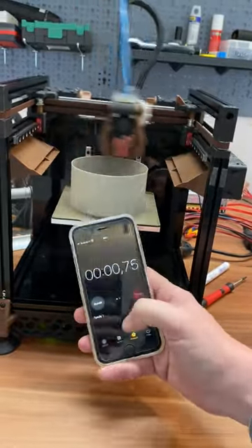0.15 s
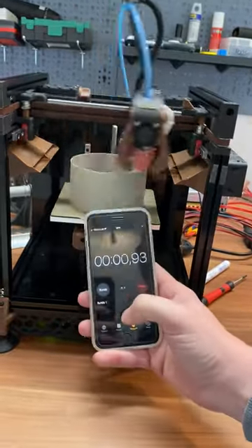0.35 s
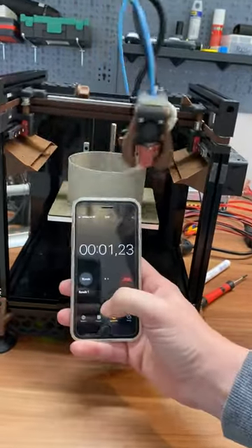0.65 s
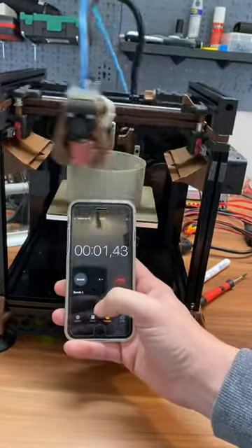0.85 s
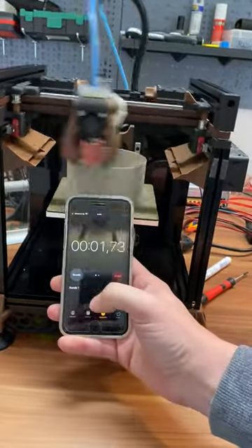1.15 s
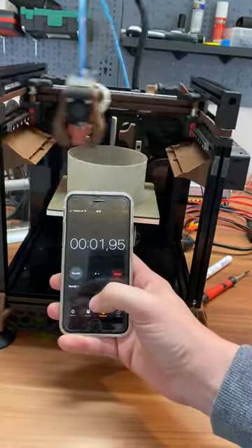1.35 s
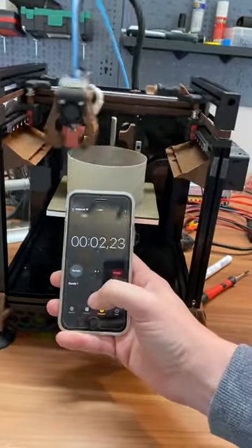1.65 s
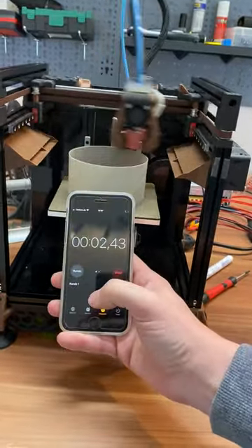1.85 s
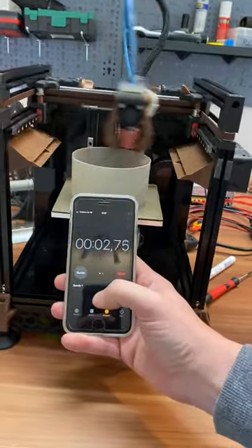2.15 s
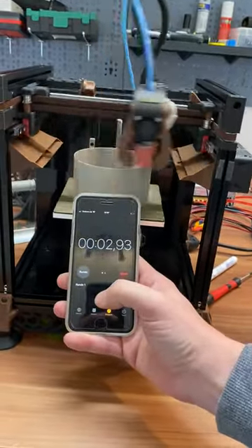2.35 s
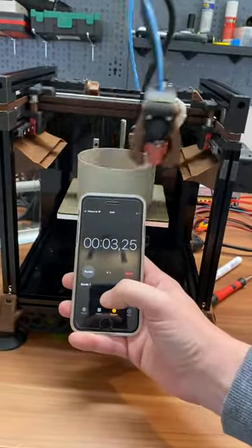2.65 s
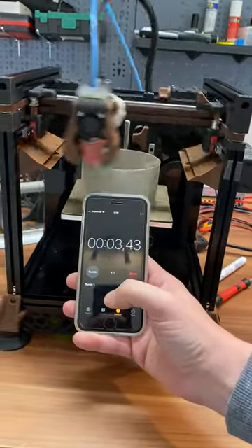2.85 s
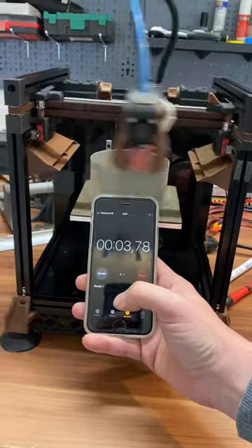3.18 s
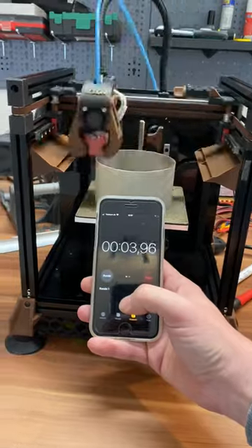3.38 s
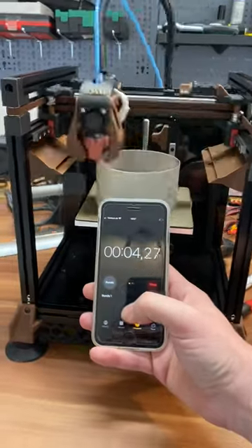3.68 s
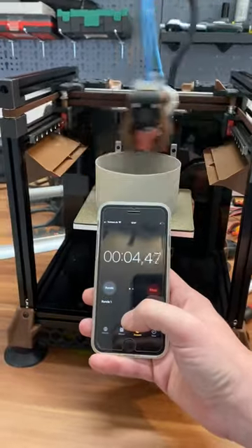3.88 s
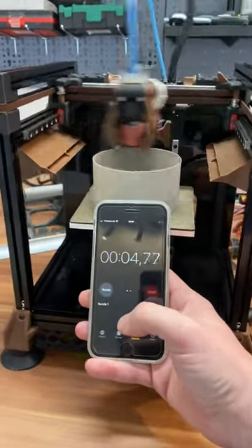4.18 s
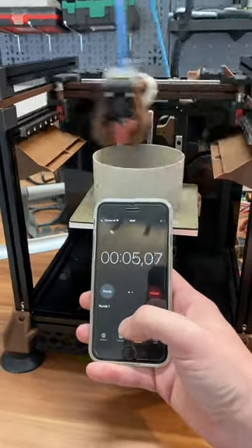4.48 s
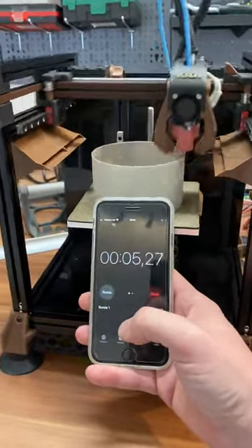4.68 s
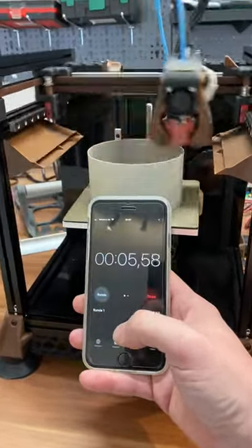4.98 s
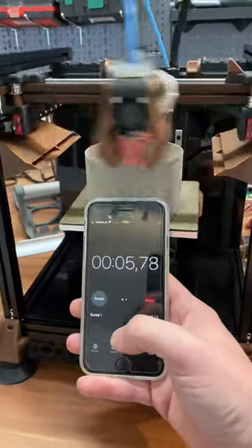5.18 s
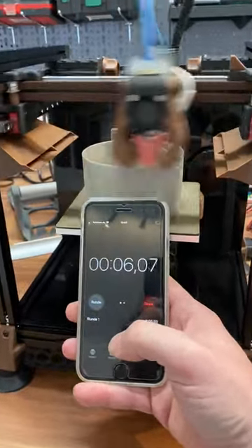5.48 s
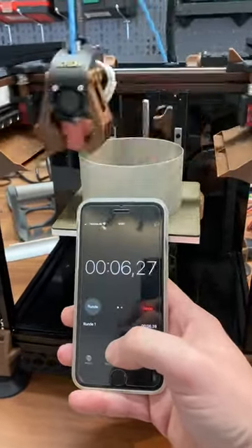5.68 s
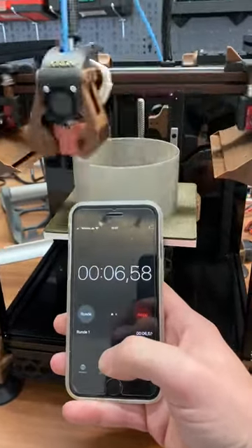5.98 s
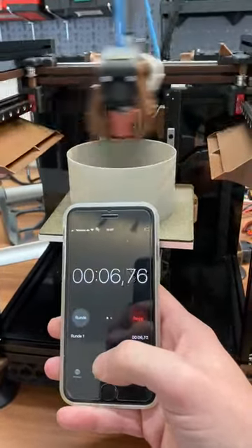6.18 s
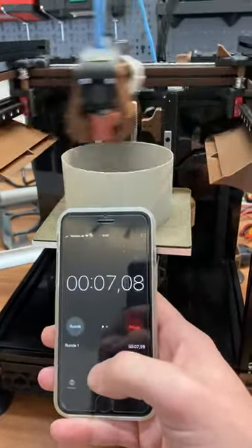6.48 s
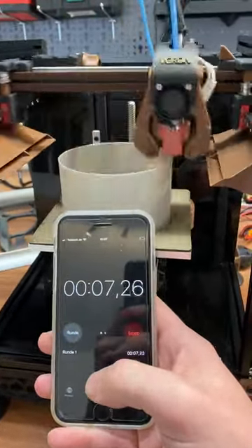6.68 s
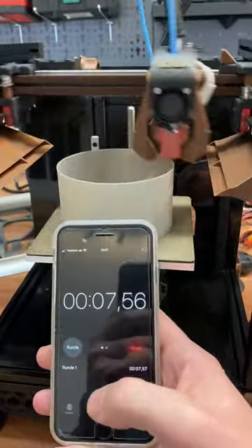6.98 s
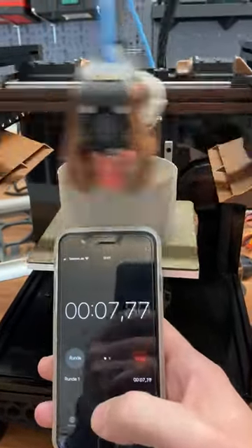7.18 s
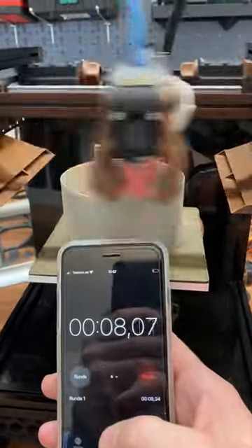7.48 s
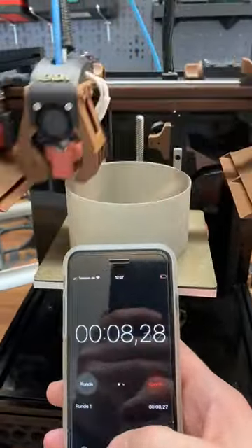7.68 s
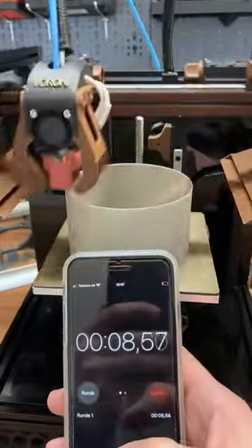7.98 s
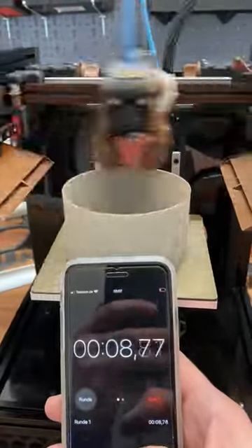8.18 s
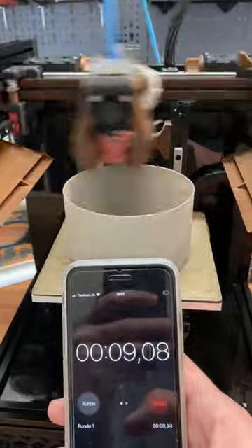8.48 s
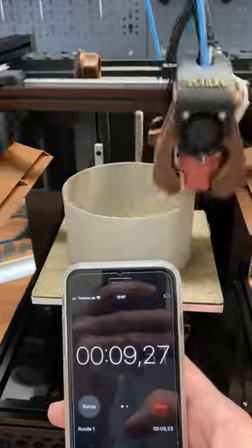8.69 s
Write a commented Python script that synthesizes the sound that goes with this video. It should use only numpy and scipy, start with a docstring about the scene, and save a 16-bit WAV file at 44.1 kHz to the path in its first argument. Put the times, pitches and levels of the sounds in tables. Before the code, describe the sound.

Small cooling fans on a 3D printer hiss and whine continuously, their high tones wavering over a low hum.

```python
"""A workshop with a fast 3D printer. Four small six-bladed blowers hum at their shaft speeds and whine
at multiples of the blade-passing rate; the speeds are nearly equal, so the tones beat. Beneath them
turbulent air rushes and resonates in the ducts. As a handheld phone moves slowly nearer, the rush
grows and changes colour, and a low draught rumble rises. From 8.4 to 11.3 kHz the hiss is opposite
in left and right, with nothing in the centre."""
import sys
import numpy as np
from scipy import signal
from scipy.fft import rfft, irfft, next_fast_len
from scipy.io import wavfile
from scipy.ndimage import uniform_filter1d, map_coordinates

SR = 44100
rng = np.random.default_rng(int(sys.argv[2]) if len(sys.argv) > 2 else 0)


def bounce(signal):
    """Save signal as a 16-bit WAV file at the path given by the first command-line argument."""
    frames = np.transpose(np.atleast_2d(signal))
    limited = np.clip(frames, -1, 1)
    pcm = np.round(limited * 32767).astype(np.int16)
    wavfile.write(sys.argv[1], SR, pcm)


N = 390285

# The phone's approach. Each row: time in seconds, rush and rumble levels in dB, nearness from 0 to 1.
APPROACH = [(0, -24, -50, 0.07), (1, -23.5, -63, 0), (2, -23.5, -64.5, 0.1), (3, -24, -58, 0),
            (4, -23.5, -52, 0.2), (4.75, -23, -52, 0.28), (5.5, -23, -52, 0.43), (6.25, -22.5, -46, 0.63),
            (7, -22, -48, .7), (7.4, -21.5, -44.5, 0.94), (7.75, -21.5, -46.5, 1), (8.1, -22, -47, 1),
            (8.45, -22, -43, 1), (8.85, -22, -45.5, 1)]


def blowers():
    """Superposition: tones of nearly equal frequency beat, while turbulence modulates their levels."""
    # Each row: time in seconds, speed of each of the four shafts in revolutions per second.
    shaft_speeds = [(0.0, 550.6, 552.9, 553.53, 556.01), (0.253, 550.71, 553.13, 553.4, 555.89),
                    (0.506, 550.91, 553.41, 553.77, 555.87), (0.759, 550.86, 553.41, 553.78, 555.91),
                    (1.011, 550.43, 553.59, 553.87, 555.91), (1.264, 550.26, 553.61, 553.68, 555.77),
                    (1.517, 550.21, 553.39, 553.65, 555.74), (1.77, 549.91, 553.41, 553.88, 555.92),
                    (2.023, 549.88, 553.5, 553.8, 555.93), (2.276, 550.07, 553.56, 553.87, 555.95),
                    (2.529, 550.08, 553.56, 553.9, 555.72), (2.781, 550.06, 553.46, 553.97, 555.69),
                    (3.034, 549.79, 553.58, 553.92, 555.78), (3.287, 549.61, 553.55, 553.92, 555.77),
                    (3.54, 549.56, 553.4, 553.81, 555.9), (3.793, 549.69, 553.34, 553.78, 556.07),
                    (4.046, 550.33, 553.31, 553.85, 556.17), (4.299, 550.75, 553.67, 553.75, 556.32),
                    (4.551, 550.64, 553.5, 553.73, 556.19), (4.804, 550.37, 553.1, 553.45, 556.03),
                    (5.057, 549.65, 553.15, 553.46, 556.03), (5.31, 549.77, 553.38, 553.58, 556.05),
                    (5.563, 550.02, 553.17, 553.74, 556.19), (5.816, 549.78, 552.89, 553.85, 555.89),
                    (6.069, 550.12, 552.97, 553.95, 555.78), (6.321, 550.04, 553.19, 553.75, 555.76),
                    (6.574, 549.71, 553.01, 553.81, 555.74), (6.827, 549.37, 552.78, 553.95, 555.81),
                    (7.08, 549.5, 552.74, 553.99, 555.96), (7.333, 549.63, 552.96, 553.92, 555.77),
                    (7.586, 549.34, 553.28, 553.64, 555.79), (7.839, 549.12, 553.38, 553.72, 555.81),
                    (8.091, 549.35, 553.31, 553.85, 555.87), (8.344, 549.99, 553.1, 553.73, 555.91),
                    (8.597, 550.47, 553.33, 553.69, 556.04), (8.85, 550.51, 553.34, 553.67, 555.99)]
    # Hum at the shaft speed. Each row: time in seconds, level of each blower in dB.
    hum_levels = [(0.0, -64, -45, -61, -41.5), (0.8, -48, -46, -48, -41.5), (1.61, -44, -49, -61, -42),
                  (2.41, -51, -45, -59, -41.5), (3.22, -47, -48, -47, -40), (4.02, -45, -47.5, -52.5, -40),
                  (4.83, -44, -45.5, -46, -41), (5.63, -46, -42, -45.5, -40.5),
                  (6.44, -46, -48.5, -46.5, -40.5), (7.24, -44, -54, -46.5, -40),
                  (8.05, -48, -57, -43.5, -43.5), (8.85, -47, -46, -42, -40.5)]
    # Blade tones as print head and phone move. Each row: time in seconds, then levels in dB of the
    # four blowers at order 6, at order 12 and at order 24.
    blade_levels = [(0.0, -52.0, -47.0, -50.0, -45.0, -60.0, -43.0, -48.0, -52.0, -69.0, -53.0, -50.0, -53.0),
                    (0.52, -49.0, -44.0, -48.0, -44.0, -54.0, -50.0, -52.0, -54.0, -58.0, -57.0, -55.0, -53.0),
                    (1.04, -49.0, -44.0, -44.0, -46.0, -48.0, -51.0, -54.0, -49.0, -54.0, -62.0, -59.0, -54.0),
                    (1.56, -50.0, -46.0, -46.0, -42.0, -52.0, -54.0, -53.0, -46.0, -59.0, -57.0, -54.0, -51.0),
                    (2.08, -47.0, -44.0, -45.0, -42.0, -52.0, -55.0, -53.0, -45.0, -59.0, -57.0, -56.0, -53.0),
                    (2.6, -48.0, -44.0, -46.0, -42.0, -53.0, -60.0, -55.0, -46.0, -57.0, -57.0, -55.0, -50.0),
                    (3.12, -45.0, -46.0, -42.0, -44.0, -54.0, -60.0, -53.0, -45.0, -60.0, -60.0, -59.0, -50.0),
                    (3.64, -45.0, -42.0, -43.0, -42.0, -48.0, -55.0, -49.0, -46.0, -54.0, -51.0, -53.0, -49.0),
                    (4.16, -42.0, -39.0, -39.0, -39.0, -46.0, -48.0, -45.0, -49.0, -52.0, -51.0, -49.0, -55.0),
                    (4.69, -46.0, -42.0, -39.0, -38.0, -40.0, -46.0, -50.0, -42.0, -50.0, -52.0, -62.0, -58.0),
                    (5.21, -43.0, -46.0, -43.0, -41.0, -40.0, -46.0, -50.0, -40.0, -52.0, -51.0, -55.0, -57.0),
                    (5.73, -43.0, -41.0, -41.0, -37.0, -38.0, -48.0, -51.0, -42.0, -47.0, -50.0, -55.0, -51.0),
                    (6.25, -42.0, -36.0, -37.0, -38.0, -38.0, -44.0, -50.0, -42.0, -48.0, -47.0, -49.0, -51.0),
                    (6.77, -44.0, -37.0, -37.0, -36.0, -38.0, -47.0, -49.0, -47.0, -48.0, -47.0, -49.0, -57.0),
                    (7.29, -43.0, -36.0, -37.0, -35.0, -40.0, -54.0, -48.0, -46.0, -51.0, -52.0, -49.0, -54.0),
                    (7.81, -39.0, -34.5, -34.5, -33.0, -42.0, -62.0, -50.0, -42.0, -58.0, -49.0, -48.0, -52.0),
                    (8.33, -43.0, -40.0, -41.0, -38.0, -39.0, -46.0, -47.0, -43.0, -48.0, -50.0, -48.0, -52.0),
                    (8.85, -47.0, -42.0, -43.0, -40.0, -35.0, -47.0, -46.0, -42.0, -48.0, -47.0, -46.0, -58.0)]
    # Order 18 shifts once, as the phone starts forward. Each row: a blower's early and late level in dB.
    overtone_levels = [(-47, -39), (-38.5, -41.5), (-39, -38), (-44, -37)]
    # Each row: time in seconds, the left channel's phase lead in radians on each blower's order 6.
    blade_leads = [(0.0, 3.4, 3.0, 3.0, 3.5), (0.52, 2.5, 2.9, 3.0, 3.3), (1.04, 3.1, 3.1, 3.1, 3.5),
                   (1.56, 3.4, 2.9, 2.8, 3.1), (2.08, 3.4, 4.0, 2.7, 2.8), (2.6, 3.4, 4.2, 2.4, 3.1),
                   (3.12, 3.4, 3.9, 2.5, 3.3), (3.64, 2.5, 2.9, 2.4, 2.3), (4.16, 2.9, 2.3, 2.3, 2.2),
                   (4.69, 2.6, 2.5, 2.6, 2.2), (5.21, 2.8, 2.7, 2.7, 2.1), (5.73, 2.4, 2.9, 2.5, 2.4),
                   (6.25, 2.7, 2.7, 2.7, 2.6), (6.77, 2.9, 2.7, 2.6, 2.4), (7.29, 2.4, 2.3, 2.0, 1.5),
                   (7.81, 1.9, 2.1, 2.1, 1.1), (8.33, 1.6, 2.3, 2.3, 0.6), (8.85, 1.4, 2.3, 2.3, 0.1)]
    # Each row: left minus right level in dB of one blower's order 6, far and near.
    blade_balance = [(1, -.5), (0, 0), (.5, -1), (3, -2)]
    blades, orders = 6, (1, 6, 12, 24, 18)  # multiples of the shaft speed
    flicker_db = (.3, 1.5, 2, 2, 2)  # rms, for each order
    start_turns = (.99, .54, .66, .46)  # the shafts' angles in turns at the start
    shift_middle_s, shift_length_s, slip_rev_per_s = 3.5, 1.3, .13
    levels = curves(hum_levels) + curves(blade_levels)
    leads, near = curves(blade_leads), curves(APPROACH)[-1]
    late = np.clip((np.arange(N) / SR - shift_middle_s) / shift_length_s + .5, 0, 1)
    tones = np.zeros((2, N))
    for k, speed in enumerate(curves(shaft_speeds)):
        turns = start_turns[k] + np.cumsum(speed) / SR
        slip = np.cumsum(slip_rev_per_s * wobble(14)) / SR + rng.random()  # air lags the blades unevenly
        order_levels = [*levels[k::4], blend(late, *overtone_levels[k])]
        for order, db, depth_db in zip(orders, order_levels, flicker_db):
            left = channel_gain(order * speed.mean(), side=1)
            if order == blades:  # the blade-passing tone wanders in direction
                lead = leads[k] + .35 * wobble(14)
                left = amp(blend(near, *blade_balance[k]) / 2) * np.exp(.5j * lead)
            phase = 2 * np.pi * order * (turns + slip * (order > 1))
            tone = np.sqrt(2) * amp(db + depth_db * wobble(10)) * np.exp(1j * phase)
            tones += [(tone * left).imag, (tone / left).imag]
    return tones


def air_rush():
    """Turbulence radiates broadband noise: two independent streams, coloured by the ducts."""
    # The roar at 1 to 1.6 kHz swells and sags. Each row: time in seconds, gain in dB over the rush.
    roar_gains = [(0, -0.5), (1, -0.5), (2, -0.3), (3, -0.1), (4, -0.5), (5, 1.1), (6, 0.2), (6.6, 1.5),
                  (7, 0), (7.4, 1), (7.8, 1.5), (8.2, 1), (8.5, -0.8), (8.85, 1.5)]
    roar_hz, roar_width_hz = 1290, 700
    rush_db, _, near = curves(APPROACH)
    spectra = signal.stft(rng.standard_normal((2, N + 512)), nperseg=512)[2]
    eddies = rng.standard_normal(spectra.shape[1:])  # smoothed into patches of more and less noise
    eddies = uniform_filter1d(eddies, size=8, axis=0)
    eddies = uniform_filter1d(eddies, size=12, axis=1)
    noise = signal.istft(spectra * amp(0.95 * unit(eddies)), nperseg=512)[1][:, :N]
    far_air = filtered(noise, lambda hz: duct_colour(hz, place=1))
    near_air = filtered(noise, lambda hz: duct_colour(hz, place=2))
    rush = unit(blend(near, unit(far_air), unit(near_air)))
    roar = filtered(rush, lambda hz: np.exp(-(2 * (hz - roar_hz) / roar_width_hz) ** 4))
    rush = rush + (amp(curves(roar_gains)[0]) - 1) * roar
    return amp(rush_db + 0.25 * wobble(7)) * rush


def duct_colour(hz, place):
    """Resonances add in power to the broad rush, as heard from far (place 1) or near (place 2)."""
    # Each row: frequency in Hz, relative spectral level in dB far and near.
    rush_spectrum = [(20, -62, -54.5), (64, -14.5, -17), (260, -16, -16), (430, -15.5, -14),
                     (640, -10.5, -8), (2370, -6, -7.5), (2780, -9.5, -6), (4370, -7.5, -6),
                     (6030, -10, -9.5), (7750, -12, -9), (9500, -55, -61), (11680, -13, -11.5),
                     (15000, -18.5, -18)]
    # Duct and frame resonances, and humps of turbulence round the blade tones.
    # Each row: centre and width in Hz, relative peak level in dB far and near.
    resonances = [(174, 73, -14.5, -16), (336, 71, -12, -16), (1040, 194, -6.5, -3.5),
                  (1283, 127, -4, -2.5), (1260, 35, -4, -7), (1480, 59, -6, -8.5), (1504, 550, -2.5, -3.5),
                  (1877, 240, 1, -4), (1757, 37, 0, -2), (1927, 60, -7, -11), (3314, 140, -3.5, -5.5),
                  (4000, 190, -11, -14.5), (4990, 480, -5.5, -5.5), (5315, 250, -2, -3),
                  (5440, 85, -2.5, -3), (6580, 490, -10.5, -8), (8055, 180, -4, -4.5),
                  (9800, 110, -43, -40), (13350, 520, -21, -22)]
    notch_hz, notch_width_hz, notch_db = 1168, 36, (-5, 0)  # from afar, a frame echo cancels this band
    peak = lambda centre, width: 1 / (1 + (2 * (hz - centre) / width) ** 2)
    power = amp(along(rush_spectrum, hz, column=place)) ** 2
    for centre, width, *peak_db in resonances:
        power += (amp(peak_db[place - 1]) * peak(centre, width)) ** 2
    return np.sqrt(power) * amp(notch_db[place - 1] * peak(notch_hz, notch_width_hz))


def draught():
    """Slow pressure fluctuations in a draught make two independent streams of low rumble."""
    # Each row: frequency in Hz, relative spectral level in dB.
    rumble_spectrum = [(15, -55), (28, -25), (40, -7.5), (55, -0.5), (90, -1), (130, -4.5), (300, -7.5),
                       (600, -32)]
    _, rumble_db, _ = curves(APPROACH)
    rumble = filtered(rng.standard_normal((2, N)), lambda hz: amp(along(rumble_spectrum, hz)))
    return amp(rumble_db + 1.8 * wobble(3.7)) * unit(rumble)


def channel_gain(hz, side):
    """Level and phase panning: complex gain of the left (side > 0) or right (side < 0) channel."""
    # Each row: frequency in Hz, left minus right level in dB.
    level_differences = [(60, 0), (330, -.5), (520, -2.7), (850, -3), (1150, -4), (1400, -2.3), (1800, -.3),
                         (2100, 1.2), (2400, -2), (2750, -4.7), (3200, -2), (3600, -.3), (4500, 1),
                         (5500, 1.7), (6400, .6), (7300, 0)]
    # Each row: frequency in Hz, phase lead of the left channel in radians.
    # From 8.4 to 11.3 kHz the hiss is opposite in left and right, with nothing in the centre.
    phase_leads = [(0, 0), (150, 0), (520, -.5), (1380, .2), (2150, .1), (2750, -3.2), (4220, -3.9),
                   (4910, -3.7), (5680, -4.6), (8100, -3.5), (8400, -3.14), (11300, -3.14), (12400, -2.3),
                   (15700, -.7)]
    gain = amp(side * along(level_differences, hz) / 2)
    return gain * np.exp(.5j * side * along(phase_leads, hz, scale=np.asarray))


def stereo_spread(streams):
    """Sum and difference mixing: two weighted noise streams spread the air between left and right."""
    # Each row: frequency in Hz, likeness of left and right from 0 to 1, before the phase shift.
    likeness = [(0, 1), (150, .995), (300, .97), (700, .83), (1300, .87), (2000, .94), (2350, .4),
                (2700, .1), (3200, .65), (4300, .65), (5300, .8), (6600, .85), (7300, .77), (8200, .88),
                (8400, .998), (11300, .998), (11800, .8), (13500, .75), (15700, .57)]
    angle = lambda hz: np.arccos(along(likeness, hz, scale=np.asarray)) / 2
    main, spread = filtered(streams, lambda hz: np.array([np.cos(angle(hz)), np.sin(angle(hz))]))
    left = filtered(main + spread, lambda hz: channel_gain(hz, side=1))
    right = filtered(main - spread, lambda hz: channel_gain(hz, side=-0.98))
    return np.array([left, right])


def amp(db):
    """Amplitude ratio of a level in dB."""
    return 10 ** (np.asarray(db) / 20)


def unit(x):
    """Normalisation to an rms of 1."""
    return x / np.sqrt(np.mean(x ** 2))


def blend(share, first, last):
    """Linear crossfade as share goes from 0 to 1."""
    return first + share * (last - first)


def along(table, hz, column=1, scale=np.log1p):
    """Interpolation of one column over frequency, logarithmic by default."""
    columns = np.transpose(table)
    return np.interp(scale(hz), scale(columns[0]), columns[column])


def curves(table):
    """Interpolation over time: one value per sample for each column after the first."""
    seconds, *columns = np.transpose(table)
    return [np.interp(np.arange(N) / SR, seconds, column) for column in columns]


def wobble(rate):
    """Smooth random modulation with an rms of 1 and rate knots a second."""
    steps = np.arange(0, N + 128, 128)
    knots = rng.standard_normal(int(N * rate / SR) + 6)
    coarse = map_coordinates(knots, [steps * rate / SR])
    return np.interp(np.arange(N), steps, unit(coarse))


def filtered(x, response):
    """Linear filtering: the spectrum of x times a complex response of frequency."""
    size = next_fast_len(N + SR // 4)
    hz = np.fft.rfftfreq(size, 1 / SR)
    return irfft(rfft(x, size) * response(hz), size)[..., :N]


def scene():
    """Superposition: air noise and blower tones add in each channel."""
    return stereo_spread(air_rush() + draught()) + blowers()


def record(dry):
    """Band limiting: the phone passes nothing above its cutoff."""
    cutoff_hz = 15750
    return filtered(dry, lambda hz: hz < cutoff_hz)


dry = scene()
out = record(dry)
bounce(out)
```